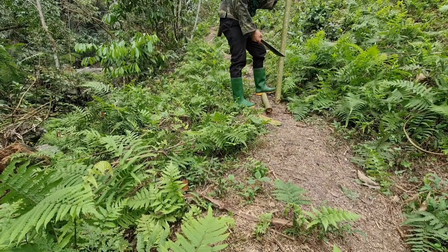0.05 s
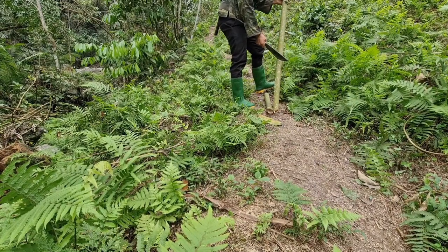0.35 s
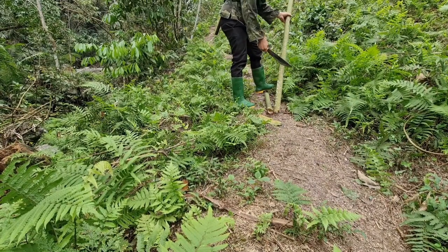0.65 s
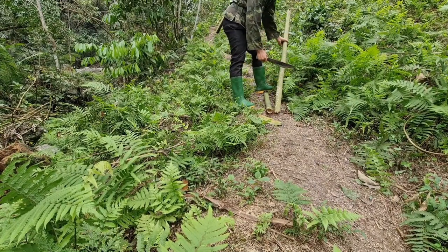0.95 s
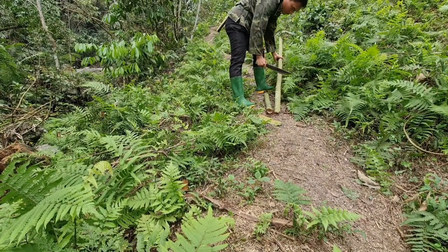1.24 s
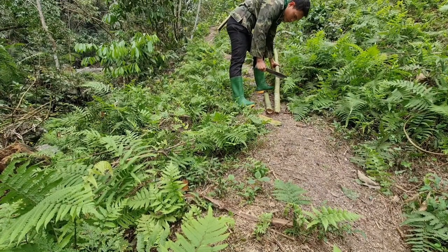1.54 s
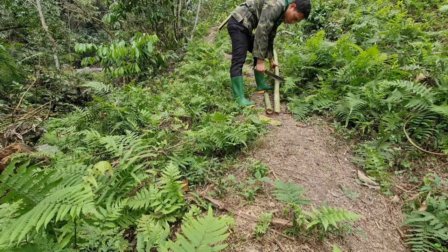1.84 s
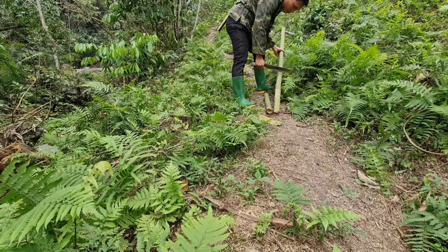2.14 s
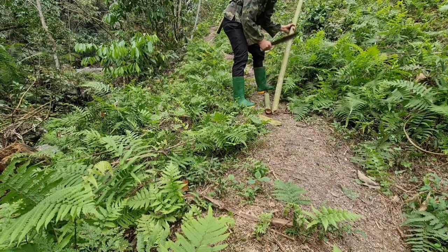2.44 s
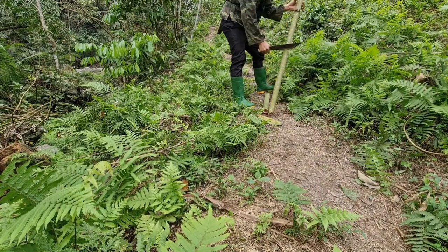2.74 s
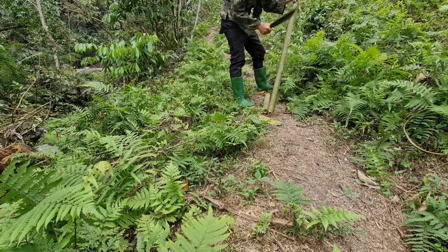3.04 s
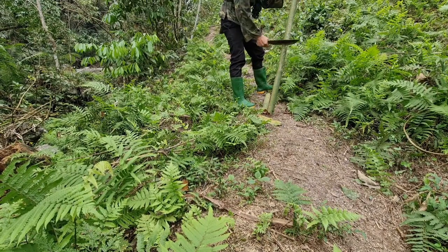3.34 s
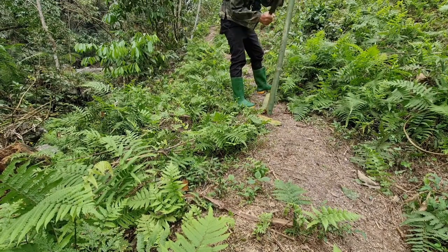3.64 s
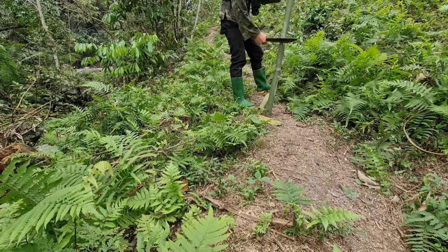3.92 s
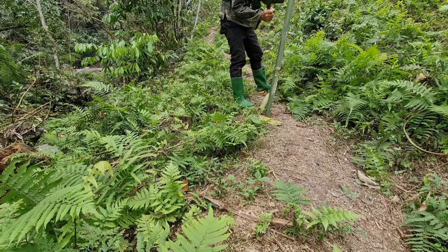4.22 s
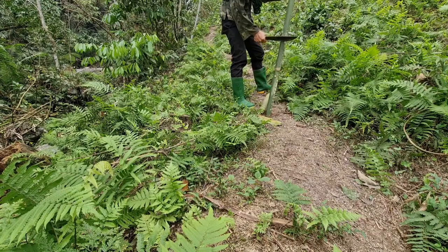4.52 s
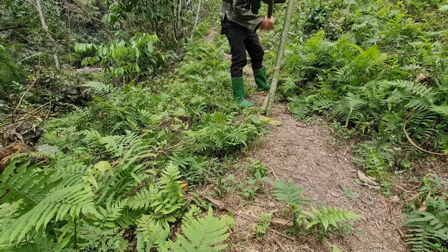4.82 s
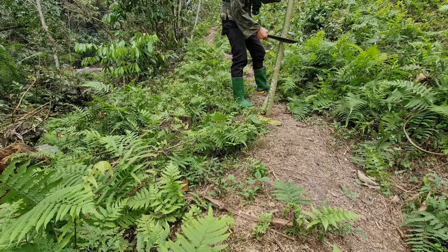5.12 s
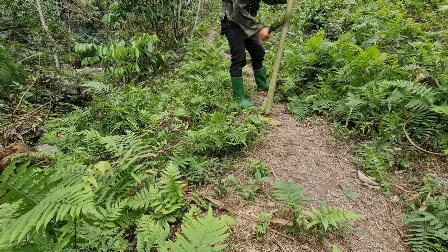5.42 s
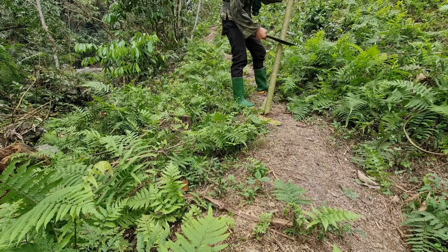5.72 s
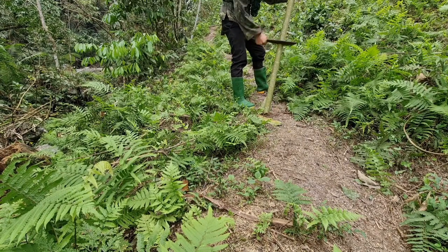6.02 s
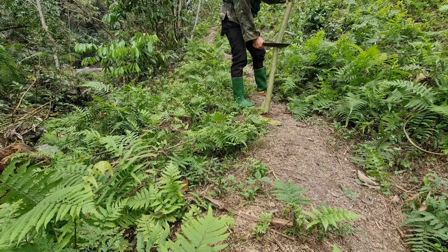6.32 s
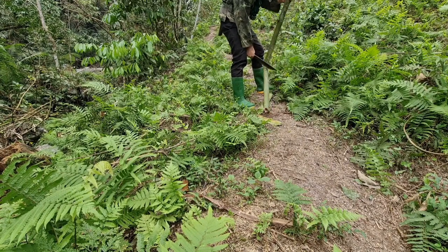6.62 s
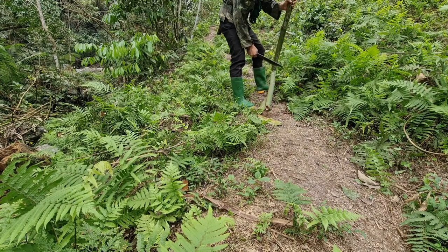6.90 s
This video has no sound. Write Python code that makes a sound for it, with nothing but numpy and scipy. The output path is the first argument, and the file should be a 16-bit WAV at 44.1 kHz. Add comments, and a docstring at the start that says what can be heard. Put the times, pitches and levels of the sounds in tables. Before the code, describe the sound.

A machete chops a hollow bamboo pole outdoors, a few metres from the microphone and slightly to the right. First come only a tap, dull scuffs and a quiet forest hush with a faint distant hum. Eight evenly paced cracking blows follow, with small rebound knocks and short echoes from the trees, ending in a few light splitting clacks. Dry leaves tick and a bird whistles faintly between strokes.

```python
"""On a jungle path, a few metres away, a machete chops into a bamboo pole.
Each impact cracks, drives the pole's foot into the earth and excites the modes of the hollow tube and
the steel blade; blade and pole then rebound together. Light clacks, scuffs and leaf ticks fall between.
Ferns and trees scatter the blows, over a soft forest hush, a far hum and a few thin bird whistles."""
import sys
import numpy as np
from scipy import signal
from scipy.fft import rfft, irfft
from scipy.io import wavfile
from scipy.ndimage import uniform_filter1d

SR = 44100
rng = np.random.default_rng(int(sys.argv[2]) if len(sys.argv) > 2 else 0)


def dump(signal):
    """Clip the signal to [-1, 1] and save it as 16-bit WAV at the path in sys.argv[1]."""
    limited = np.clip(np.atleast_2d(signal).T, -1, 1)
    pcm = np.round(limited * 32767).astype(np.int16)
    wavfile.write(sys.argv[1], SR, pcm)


N = 306936
HZ = np.fft.rfftfreq(8192, 1 / SR)  # frequency grid of the filters


def amp(db):
    """Amplitude ratio of a level in decibels."""
    return 10 ** (np.asarray(db) / 20)

def read(points, hz, column=1):
    """Linear interpolation of a table column over log frequency."""
    points = np.array(points)
    return np.interp(np.log(hz + 1), np.log(points[:, 0] + 1), points[:, column])

def unit_rms(x):
    """Normalisation to rms 1."""
    return x / np.sqrt(np.mean(x ** 2) + 1e-20)

def add(mix, s, sound):
    """Superposition: a sound joins the mix at time s."""
    part = mix[..., max(round(s * SR), 0):][..., :sound.shape[-1]]
    part += sound[..., :part.shape[-1]]

def colour(x, db):
    """Causal filtering with the gain db, given on HZ."""
    log_gain = np.log(amp(np.r_[db, db[-2:0:-1]]))
    taps = np.fft.ifft(np.exp(signal.hilbert(log_gain).conj())).real[:len(HZ) // 2]
    return signal.oaconvolve(x, taps[None], axes=1)[:, :x.shape[1]]

def noise_pair(size, coherence):
    """Partial coherence: left and right white noise share a part that depends on frequency."""
    common, separate = rfft(rng.standard_normal((2, size)))
    share = np.clip(read(coherence, np.fft.rfftfreq(size, 1 / SR)), 0, 1)
    return irfft([common, share * common + np.sqrt(1 - share ** 2) * separate], size)

def drift(rate_hz):
    """Random modulation: low-passed noise of rms 1."""
    hz = np.fft.rfftfreq(N, 1 / SR)
    return unit_rms(irfft(rfft(rng.standard_normal(N)) * np.exp(-(hz / rate_hz) ** 2), N))

# spectrum of the hush: f/Hz, relative level/dB
HUSH_SPECTRUM = [(25, -29), (45, -6), (70, -3.5), (120, -14), (230, -12.5), (360, -21), (560, -12),
                 (750, -6), (1100, -14), (2200, -16.5), (4500, -22), (7800, -28), (9500, -35),
                 (15000, -38.5)]
# left-right coherence of distant sound: f/Hz, coherence (0-1)
DIFFUSE_COHERENCE = [(60, 0.94), (300, 0.53), (700, 0.05), (1500, 0.017), (8000, 0.015)]
# envelope of the hum: t/s, level/dB
HUM_ENVELOPE = [(0, -75), (.9, -62.5), (1.8, -61.5), (2.6, -80), (4.5, -88), (6.9, -63)]
def forest(hush_db=-55.5, sway_db=1.36, hum_hz=70):
    """A diffuse field of distant leaves, with a far hum modulated at random in pitch and level."""
    hush = unit_rms(colour(noise_pair(N, DIFFUSE_COHERENCE), read(HUSH_SPECTRUM, HZ)))
    hum = np.sqrt(2) * np.sin(2 * np.pi * np.cumsum(hum_hz + 1.38 * drift(5.9)) / SR)
    hum_db = np.interp(np.arange(N) / SR, *np.transpose(HUM_ENVELOPE))
    return hush * amp(hush_db + sway_db * drift(1.45)) + hum * amp(hum_db + 1.5 * drift(11.4))

# left-right coherence of an impact: f/Hz, coherence (0-1)
IMPACT_COHERENCE = [(100, 1), (1000, 0.58), (3000, 0.96), (6000, 0.48), (10000, 0), (16000, 0.3)]
def impact(db, wood_db, treble_db, note_hz, note_db, decay_s, hold_s, snap,
           rise_s=0.00067, note_width=0.079, ripple_db=2.5, size=8192):
    """Source and filter: a snap and a burst of tearing fibres, coloured by the struck spot's modes."""
    t = np.arange(size) / SR
    low = 1 / (1 + (HZ / 1050) ** 4)
    high = 1 - 1 / (1 + (HZ / 3700) ** 4)
    body, edge = (unit_rms(np.exp(-np.maximum(age - hold_s, 0) / decay_s) * (1 - np.exp(-age / rise_s)))
                  for age in (t, 1.28 * t))  # the treble is spent sooner than the body
    fibres = noise_pair(size, IMPACT_COHERENCE)
    force = irfft(rfft(fibres * body) * (1 - high) + rfft(fibres * edge) * high, size)
    force[:, np.argmax(body)] += snap * np.sqrt(size) * np.exp(-decay_s / 0.0099)
    power = (abs(rfft(force)) ** 2).mean(0)
    force_db = 10 * np.log10(uniform_filter1d(power, size=90) / size + 1e-9)
    note = 1 / (1 + (np.log((HZ + 1) / note_hz) / note_width) ** 2)
    modes = uniform_filter1d(uniform_filter1d(rng.standard_normal(len(HZ)), size=16), size=16)
    modes = unit_rms(modes - uniform_filter1d(modes, size=70))  # narrow random peaks and dips
    tone_db = wood_db * low + treble_db * high + note_db * note + ripple_db * modes
    return amp(db) * colour(force, tone_db - force_db)  # the force is flattened: the wood gives the colour

# light clacks: t/s, relative level/dB, woody low-mid gain/dB, treble gain/dB
CLACKS = [(0.029, -29, -15, -13), (3.1635, -31.5, 6, 4.5), (6.071, -29.5, 1.5, 0), (6.196, -39.5, 0, 7),
          (6.5073, -28, -3.5, 12), (6.5404, -33, -9, 12), (6.5506, -39.5, -8, 26.5), (6.581, -32, -11, 17)]
def clacks(gain_db=-9):
    """Brief contact gives a broad spectrum: the blade taps the cane, and the cane splits."""
    out = np.zeros((2, N))
    for s, db, wood_db, treble_db in CLACKS:
        add(out, s, impact(db + gain_db, wood_db, treble_db, note_hz=2480, note_db=4,
                           decay_s=0.0036, hold_s=0.00029, snap=0.21))
    return out

# spectrum of a blow on bamboo: f/Hz, gain/dB
CRACK_SPECTRUM = [(40, -44), (110, -17), (200, -26.5), (370, -13), (600, -3), (950, -9), (1400, -0.5),
                  (2300, -4), (3200, -4), (4200, -7), (6500, -12), (8000, -16), (10000, -20),
                  (12000, -16.5), (15500, -27)]
# broad resonances of the wall: f/Hz, bandwidth/Hz, gain/dB
WALL_RESONANCES = [(738, 90, 5.5), (1290, 84, 6), (1780, 170, 3.5), (2250, 305, 3.5), (2980, 260, 3.5),
                   (4840, 120, 0), (5240, 84, -1.5), (6080, 180, 4.5), (6890, 150, 4.5), (8500, 250, 3.5)]
def bamboo_wall(impacts):
    """Forced response: the wall's resonances filter the impacts."""
    wall_db = sum(db / (1 + (2 * (HZ - hz) / width) ** 2) for hz, width, db in WALL_RESONANCES)
    return colour(impacts, read(CRACK_SPECTRUM, HZ) + wall_db)

# left-right coherence of sound from the undergrowth: f/Hz, coherence (0-1)
FERN_COHERENCE = [(100, 0.95), (400, 0.97), (1500, 0), (4000, 0.08), (12000, 0.65)]
def crackle(blows, gain_db=-16, settle_s=0.0081, splinters_per_s=1200):
    """Shot noise: splinters and dry litter snap at random, as strongly as each blow shakes them."""
    pole = np.exp(-1 / (settle_s * SR))
    shaking = np.sqrt(signal.lfilter([1 - pole], [1, -pole], np.diff(blows[0], prepend=0) ** 2))
    impulses = unit_rms(rng.standard_normal(N) * (rng.random(N) < splinters_per_s / SR))
    snaps = impulses * shaking * amp(gain_db)
    grain = noise_pair(256, FERN_COHERENCE) * np.exp(-np.arange(256) / 30)
    grain = signal.sosfilt(signal.butter(1, [2500, 11000], "band", fs=SR, output="sos"), grain)
    return signal.oaconvolve(snaps[None], grain / np.linalg.norm(grain[0]), axes=1)[:, :N]

# echoes from the undergrowth and from far trees: f/Hz, T60/s, level/dB
FERN_ECHOES = [(99, 0.25, 0.5), (290, 0.29, -22.5), (700, 0.14, -2), (2000, 0.14, -7.5), (6100, 0.17, -6.5),
               (14000, 0.28, -12)]
TREE_ECHOES = [(100, 0.35, -30), (400, 0.4, -16.5), (1510, 0.79, -22), (5060, 0.72, -21.5),
               (14000, 1, -24.5)]
def scatter(x, bands, coherence, rise_s, paths=3):
    """Multiple scattering: tails decay by band; chops take them in turn, as if the pole moved."""
    out, t = np.zeros((2, N)), np.arange(SR) / SR
    stroke = np.searchsorted([s - 0.1 for s, *_ in CHOPS], np.arange(N) / SR)
    for path in range(paths):
        hz, times, spectra = signal.stft(noise_pair(SR, coherence), SR, nperseg=256)
        t60 = read(bands, hz)[:, None]
        decay = amp(read(bands, hz, column=2)[:, None] - 60 * times / t60)
        unit_energy = np.sqrt(2 * np.log(1000) / (t60 * SR))
        tail = signal.istft(spectra * decay * unit_energy, SR, nperseg=256)[1][:, :SR]
        tail *= 1 - np.exp(-t / rise_s)
        out += signal.fftconvolve(x * (stroke % paths == path), tail, axes=1)[:, :N]
    return out

# stereo balance: f/Hz, left minus right level/dB
BALANCE = [(120, 0), (280, 1), (420, -11), (750, 3), (1000, -16.5), (1300, 3), (1700, -3), (3000, -1),
           (12000, -0.5)]
def from_right(x, lag_ms=0.12):
    """Time and level cues: the pole stands to the right, so the left hears it later and recoloured."""
    hz = np.fft.rfftfreq(N, 1 / SR)
    tilt = amp(read(BALANCE, hz) / 2)
    delay = np.exp(-2j * np.pi * hz * lag_ms / 1000)
    return irfft(rfft(x) * np.array([tilt * delay, 1 / tilt]), N)

# scuffs of the pole's foot: t/s, relative level/dB, decay time/s
SCUFFS = [(.19, -38, 0.02), (.286, -44.5, 0.061), (1.852, -42.5, .011)]
def scuffs(gain_db=-9.5):
    """Sliding friction: the pole shifts over the earth in dull bursts with no snap."""
    out = np.zeros((2, N))
    for s, db, decay_s in SCUFFS:
        add(out, s, impact(db + gain_db, wood_db=16, treble_db=6.5, note_hz=440, note_db=4.5,
                           decay_s=decay_s, hold_s=0, snap=0, rise_s=0.075 * decay_s))
    return out

# ticks and rustles of dry leaves: t/s, relative level/dB, decay time/s
LEAF_TICKS = [(1.055, -61.5, 0.0027), (3.074, -52.5, 0.0027), (4.012, -54, .008), (4.062, -60.5, 0.005),
              (6.66, -41.5, 0.032), (6.863, -63, 0.0031)]
def leaves(gain_db=-9):
    """Small, light radiators: dry leaves give faint transients rich in treble."""
    out = np.zeros((2, N))
    for s, db, decay_s in LEAF_TICKS:
        add(out, s, impact(db + gain_db, wood_db=0, treble_db=15, note_hz=7960, note_db=6.5,
                           decay_s=decay_s, hold_s=0, snap=0.38, rise_s=0.3 * decay_s))
    return out

# machete strokes, levels relative: t/s, level/dB, woody low-mid gain/dB, treble gain/dB,
# struck spot's f/Hz, thump level/dB, favoured tube f/Hz, ring level/dB
CHOPS = [(2.6891, -10.5, 4.5, -11.5, 6650, -24, 199, -31.5), (3.273, -14, 8, 1, 2250, -22.5, 199, -32.5),
         (3.8391, -14.5, 6, 0.5, 1960, -20, 458, -31), (4.3899, -11.5, 1.5, -2.5, 1025, -20, 97, -47),
         (4.946, -11, 1.5, 2.5, 1300, -22.5, 710, -45), (5.5121, -13, 3, 2, 1316, -22, 724, -38),
         (6.089, -8.5, -3, -1.5, 1216, -29, 195, -39.5), (6.5883, -16.5, -6, 6.5, 1047, -75, 245, -37.5)]
def chops(gain_db=-8):
    """Impulsive excitation: the edge bites into the cane, woody when blunt and bright when keen."""
    out = np.zeros((2, N))
    for s, db, wood_db, treble_db, note_hz, *_ in CHOPS:
        add(out, s, impact(db + gain_db, wood_db, treble_db, note_hz, note_db=9,
                           decay_s=0.0029, hold_s=0.005, snap=0.38))
    return out

# modes of the steel blade: f/Hz, relative level/dB, T60/s
BLADE_MODES = [(4840, -13, 0.044), (5530, -12, 0.09), (6640, 4, 0.019), (6600, -31, 0.084)]
def blade(gain_db=-13, rise_s=0.00037):
    """Damped vibration: the steel pings; a keen blow bites deep, and the wood's grip mutes it."""
    out, t = np.zeros((2, N)), np.arange(SR // 5) / SR
    for s, level_db, _, treble_db, *_ in CHOPS:
        phases = rng.random((len(BLADE_MODES), 2, 1))
        ping = sum(amp(db - 60 * t / t60) * np.sin(2 * np.pi * (hz * t + phase))
                   for (hz, db, t60), phase in zip(BLADE_MODES, phases))
        add(out, s, amp(level_db - treble_db + gain_db) * ping * (1 - np.exp(-t / rise_s)))
    return out

# modes of the hollow pole: f/Hz, relative level/dB, T60/s
TUBE_MODES = [(97, -18, 0.13), (199, 1, 0.32), (340.5, 4.5, 0.15), (458, -5.5, 0.43), (588, 0, 0.21),
              (724, 1.5, 0.35), (1300, -10, 0.091), (1410, 4, 0.34)]
def tube(gain_db=1, off_mode_db=-12, log_width=0.44, rise_s=0.0066):
    """Free vibration: the pole rings on, and the point of impact decides which modes are strongest."""
    out, t = np.zeros(N), np.arange(SR * 3 // 4) / SR
    for s, *_, favoured_hz, ring_db in CHOPS:
        for (hz, db, t60), phase in zip(TUBE_MODES, rng.random(len(TUBE_MODES))):
            miss = 1 - np.exp(-(np.log(hz / favoured_hz) / log_width) ** 2)
            mode_db = gain_db + ring_db + db + off_mode_db * miss
            envelope = amp(mode_db - 60 * t / t60) * (1 - np.exp(-t / rise_s))
            add(out, s, envelope * np.sin(2 * np.pi * (hz * t + phase)))
    return out

# modes of the pole's foot on packed earth: f/Hz, relative level/dB, T60/s
EARTH_MODES = [(101, -8.5, 0.043), (162.2, 0.5, 0.026), (221, -1.5, 0.027)]
def thumps(gain_db=11, delay_s=0.0016, rise_s=0.0023, low_cut_hz=65):
    """Heavy damping: each chop drives the pole into the earth, a dead thud with little deep bass."""
    out, t = np.zeros(N), np.arange(SR // 4) / SR
    for s, *_, thump_db, _, _ in CHOPS:
        detunes = 1 + 0.047 * rng.standard_normal(len(EARTH_MODES))
        thud = sum(amp(db - 60 * t / t60) * np.sin(2 * np.pi * hz * detune * t)
                   for (hz, db, t60), detune in zip(EARTH_MODES, detunes))
        add(out, s + delay_s, amp(thump_db + gain_db) * thud * (1 - np.exp(-t / rise_s)))
    return signal.sosfilt(signal.butter(2, low_cut_hz, "high", fs=SR, output="sos"), out)

# knocks just after a chop: t/s, relative level/dB, treble gain/dB, struck spot's f/Hz
REBOUNDS = [(2.701, -7, -3, 6050), (2.718, -14.5, -21, 760), (3.289, -10.5, 3, 1930),
            (3.3053, -14, 2.5, 1800), (3.332, -19.5, -32, 700), (3.8477, -12.5, -9, 2250),
            (3.863, -12.5, -12.5, 1016), (3.871, -15.5, -19, 1800), (4.4075, -8, -7.5, 2590),
            (4.4363, -12, -9.5, 2320), (4.9643, -11.5, 0.5, 1470), (5.003, -21.5, -3.5, 1600),
            (5.525, -11.5, -0.5, 2980), (6.101, -15, 5.5, 2000), (6.1262, -9, -1, 1290)]
def rebounds(gain_db=-10, thinning_db_per_s=95):
    """Elastic rebound: blade and pole knock again, the thinner the longer after their chop."""
    out = np.zeros((2, N))
    for s, db, treble_db, note_hz in REBOUNDS:
        chop_s, _, chop_wood_db, *_ = max(row for row in CHOPS if row[0] < s)
        wood_db = chop_wood_db - 2 - thinning_db_per_s * (s - chop_s)
        add(out, s, impact(db + gain_db, wood_db, treble_db, note_hz, note_db=6,
                           decay_s=0.0022, hold_s=0.00046, snap=0.53, note_width=0.11))
    return out

# bird whistles: t/s, duration/s, f/Hz, level/dB
WHISTLES = [(3.11, .16, 4480, -60), (4.67, .25, 3830, -64), (5.03, .34, 5140, -66)]
def bird(flutter_db=2.5):
    """Fluctuation in transit: nearly pure tones flutter on their way through the trees."""
    out, waver = np.zeros(N), 1 + 0.004 * drift(40)
    for s, duration_s, hz, db in WHISTLES:
        size = int(duration_s * SR)
        tone = np.sin(2 * np.pi * np.cumsum(hz * waver[:size]) / SR)
        add(out, s, amp(db) * tone * signal.windows.tukey(size, 0.5))
    return out * amp(flutter_db * drift(35))

def scene():
    """Superposition of the direct sound, its near and far echoes, and the forest."""
    wood = bamboo_wall(chops() + rebounds() + clacks() + scuffs() + leaves())
    blows = wood + thumps() + crackle(wood)
    near = blows + scatter(blows, FERN_ECHOES, FERN_COHERENCE, rise_s=0.0037) + tube() + blade()
    far = scatter(blows, TREE_ECHOES, DIFFUSE_COHERENCE, rise_s=0.0065)
    return from_right(near) + far + forest() + bird()

def record(dry, low_cut_hz=38, high_cut_hz=15900):
    """Soft saturation rounds the loudest peaks; band limiting removes the deep bass and top treble."""
    rounded = dry / (1 + dry ** 6) ** (1 / 6)
    lean = signal.sosfilt(signal.butter(2, low_cut_hz, "high", fs=SR, output="sos"), rounded)
    low_pass = signal.firwin(255, high_cut_hz, window=("kaiser", 9), fs=SR)
    return signal.oaconvolve(lean, low_pass[None], "same")


dry = scene()
out = record(dry)
dump(out)
```